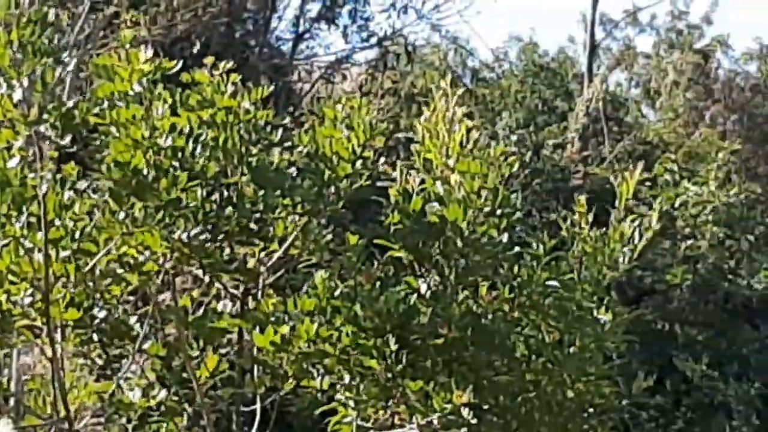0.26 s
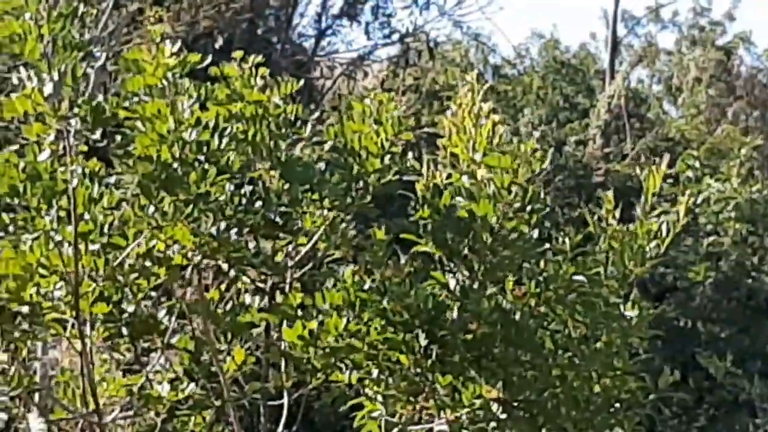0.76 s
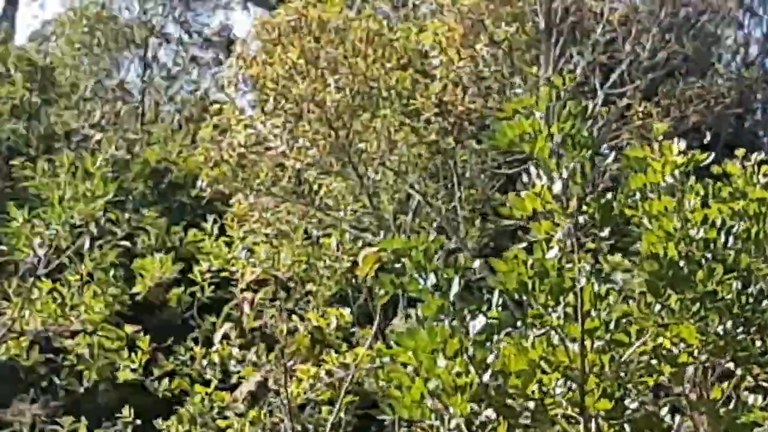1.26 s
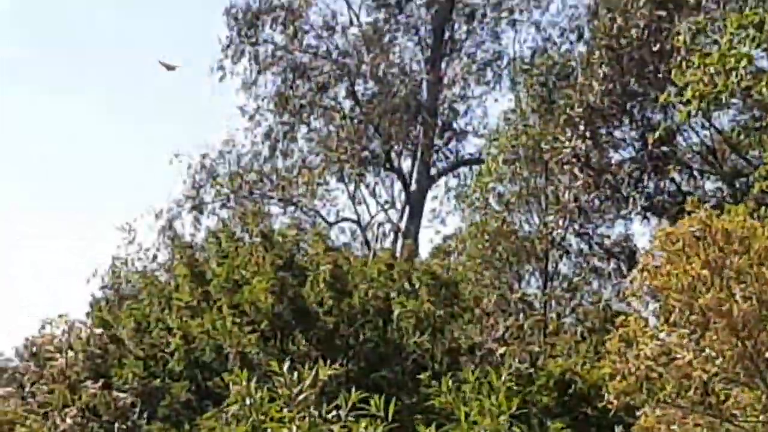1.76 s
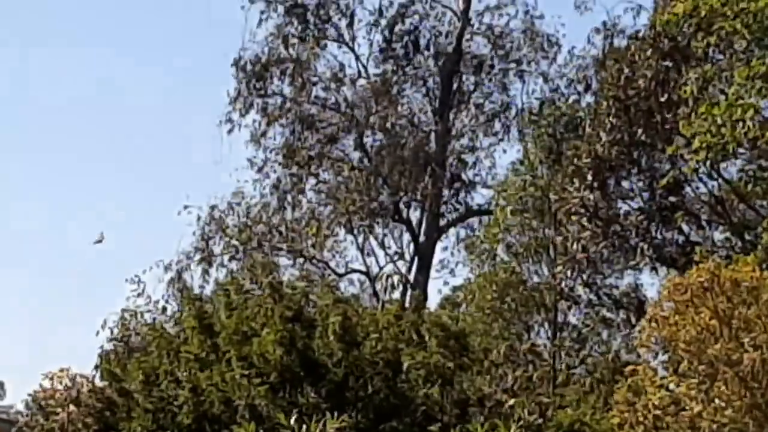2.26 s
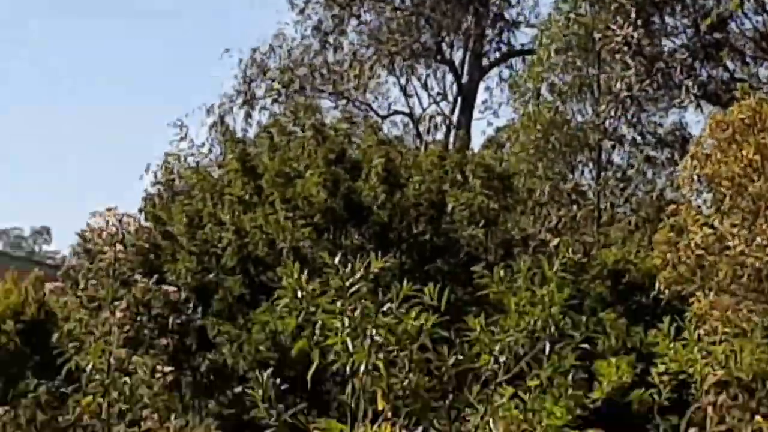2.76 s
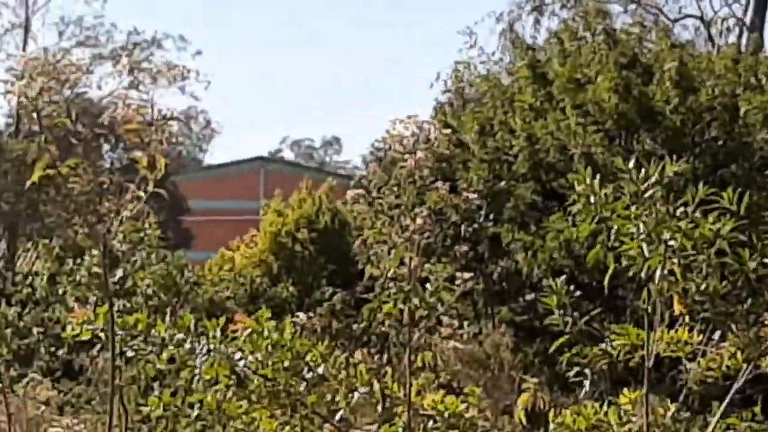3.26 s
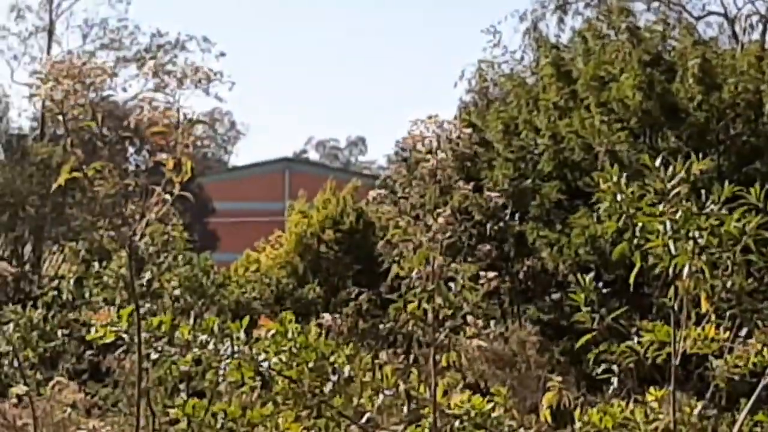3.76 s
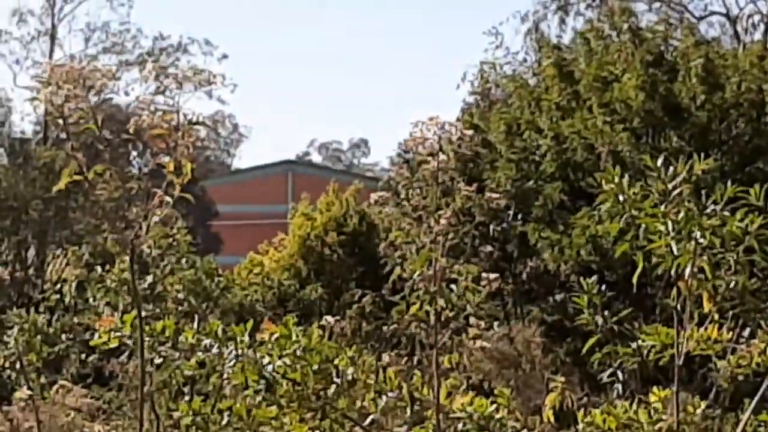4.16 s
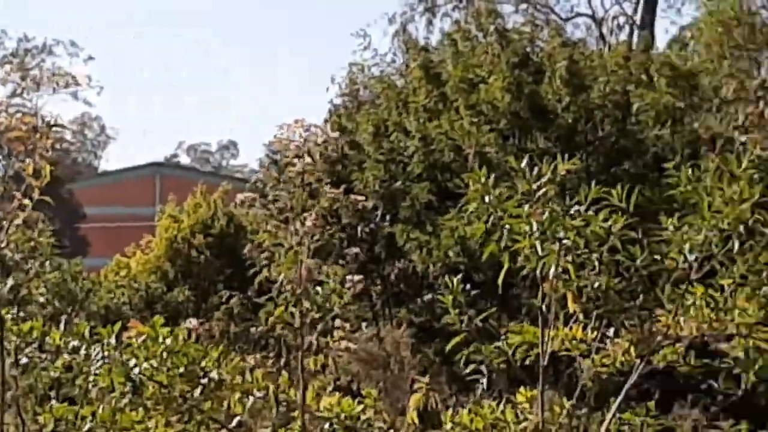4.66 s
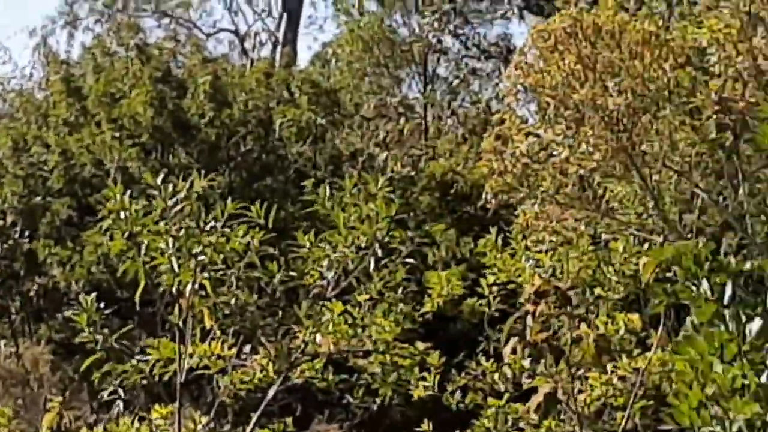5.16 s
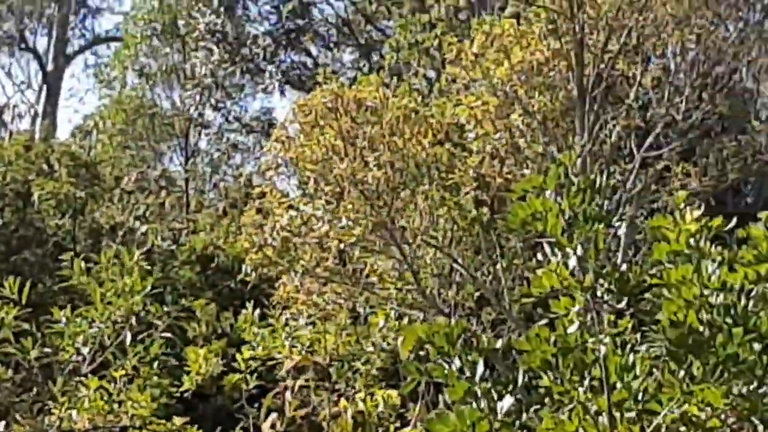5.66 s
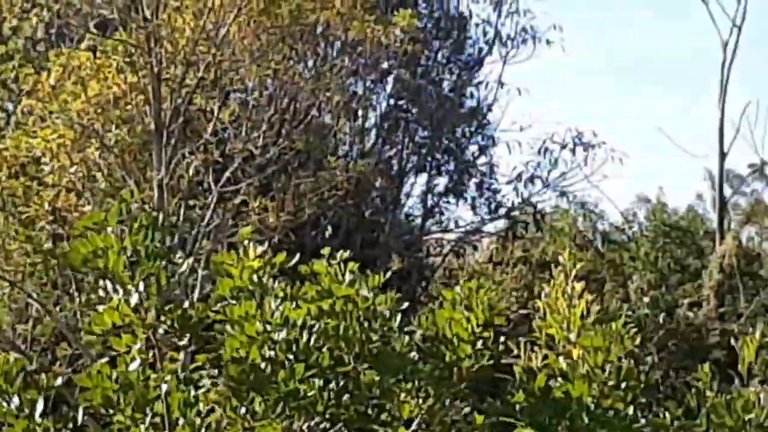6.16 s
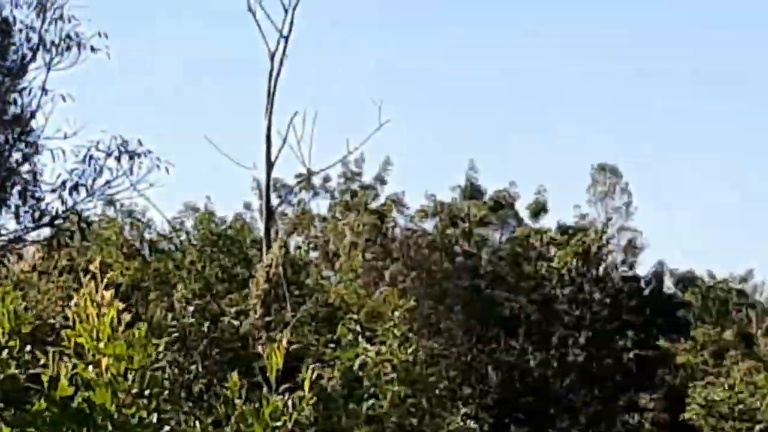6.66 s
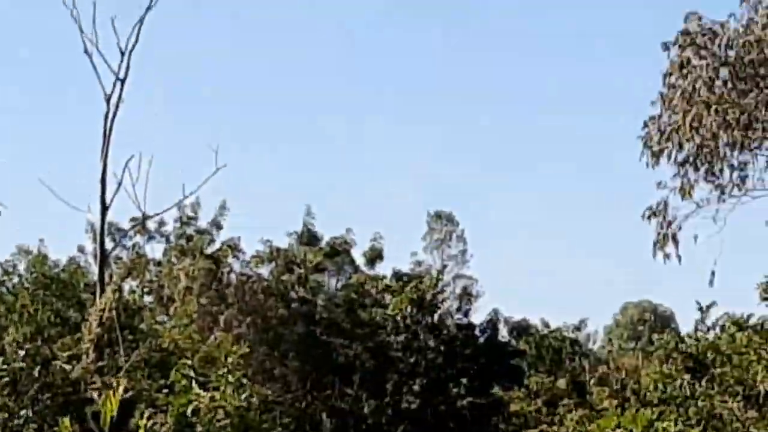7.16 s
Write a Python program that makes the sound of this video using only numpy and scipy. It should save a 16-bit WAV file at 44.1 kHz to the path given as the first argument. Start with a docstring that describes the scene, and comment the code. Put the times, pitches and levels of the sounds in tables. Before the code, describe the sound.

A near bird repeats a sharp two-note chip over chirping crickets and far birdsong while growing gusts of wind buffet and rumble on the microphone.

```python
"""Cricket chirps and a mellow whistle from the far trees come first, then a near bird's two-note chip.
The place is an open field ringed by trees, where more birds whistle, twitter and trill further off.
Gusts buffet the two microphone ports: noise follows the wind strength, and single eddies slap as pulses.
Birds are gliding tones, crickets bursts of tone; random echoes stand for the scatter of the foliage.
A haze of insects, a few dry ticks, a distant wash and a thin hiss lie around them."""
import sys
import numpy as np
from scipy import signal
from scipy.fft import rfft, irfft
from scipy.io import wavfile
from scipy.ndimage import uniform_filter1d

SR = 44100
rng = np.random.default_rng(int(sys.argv[2]) if len(sys.argv) > 2 else 0)


def to_wav(sig):
    """Store sig (one row per channel, or 1-D mono) as 16-bit WAV at the path in sys.argv[1].

    Samples outside -1..1 are clipped; the rate is SR.
    """
    pcm = np.clip(np.atleast_2d(sig), -1, 1) * 32767
    pcm = np.round(pcm).astype(np.int16)
    wavfile.write(sys.argv[1], SR, pcm.T)  # frames by channels


N = 326340
T = np.arange(N) / SR  # time [s]


def undb(db):
    """Decibels to gain."""
    return 10 ** (np.asarray(db) / 20)


def unit(x):
    """Scale to rms 1."""
    return x / np.sqrt(np.mean(x ** 2))


def curve(points, s=T):
    """Straight lines through (time, value) points, read at the times s."""
    return np.interp(s, *np.transpose(points))


def sides(pan_db):
    """Left and right gains of constant mean power; pan_db is left minus right."""
    g = undb(np.array([[.5], [-.5]]) * pan_db)
    return g / np.sqrt(np.mean(g ** 2, axis=0))


def walk(rate, size=N):
    """Smooth chance with spread 1 that changes about rate times a second."""
    f = np.arange(size // 2 + 1) * SR / size
    smooth = rfft(rng.standard_normal(size)) / (1 + (2 * f / rate) ** 4)
    return unit(irfft(smooth, size))


def noise(points):
    """Unrelated left and right noise with the given spectrum, falling away beyond its ends."""
    hz, db = np.transpose(points)
    f = np.arange(N // 2 + 1) * SR / N + 1  # the 1 keeps the logarithm finite
    skirts = np.minimum(f / hz[0], 1) ** 2 * np.minimum(hz[-1] / f, 1) ** 2
    colour = undb(np.interp(np.log(f), np.log(hz), db))
    return unit(irfft(rfft(rng.standard_normal((2, N))) * skirts * colour, N))


def add(out, s, sound):
    """Mix a stereo sound in at time s."""
    i = int(np.clip(s * SR, 0, N - 1))
    out[:, i:i + sound.shape[1]] += sound[:, :N - i]


def glide(length, start_hz, middle_hz, end_hz):
    """Progress 0-1 through a note, and its pitch arching through three points."""
    u = np.linspace(0, 1, int(length * SR))
    arch = np.polyfit([0, .5, 1], [start_hz, middle_hz, end_hz], 2)
    return u, np.polyval(arch, u)


def turn(hz):
    """Phase of an oscillator that follows a pitch."""
    return 2 * np.pi * np.cumsum(hz) / SR


def scatter(t60):
    """One second of random stereo echoes that die by 60 dB in t60 seconds."""
    level = np.sqrt(2 * np.log(1000) / SR / t60)  # offsets the greater energy of a longer tail
    return rng.standard_normal((2, SR)) * undb(-60 * T[:SR] / t60) * level


def foliage(x, near_db, near_t60, far_db, far_t60, spill=0.17):
    """Direct sound, scatter from near leaves and a duller tree-line tail; echoes spill to the other port."""
    near, far = scatter(near_t60), scatter(far_t60)
    far = signal.sosfilt(signal.butter(2, 6000, fs=SR, output="sos"), far)
    onset = np.minimum(T[:SR] / .008, 1)
    echoes = (undb(near_db) * near + undb(far_db) * far) * onset
    spread = (x + spill * x[::-1]) / (1 + spill)
    return x + signal.fftconvolve(spread, echoes, axes=1)[:, :N]


CHIP_LENGTH_S, CHIP_ATTACK_S, CHIP_RELEASE_S = 0.02206, 0.0059, 0.0086


def chip(hz, over_db, under_db):
    """A chip falls steeply, then levels off; partials flicker, each on its own, round a tone at hz."""
    fall = np.clip(.14 + (hz - 3300) / 3000, .07, .16)  # higher chips fall further
    u, pitch = glide(CHIP_LENGTH_S, hz * (1 + fall), hz, hz * 0.92)
    phase = turn(pitch / 2 * (1 + .008 * walk(800, size=len(u))))  # an octave below hz
    flicker = [undb(3.5 * walk(350, size=len(u))) for _ in range(4)]
    third = flicker[0] * np.sin(3 * phase) * u ** .5
    fourth = undb(-13) * flicker[1] * np.sin(4 * phase) * u
    undertone = undb(under_db) * flicker[2] * np.sin(phase)
    main_tone = flicker[3] ** .5 * np.sin(2 * phase)
    voice = main_tone + undertone + undb(over_db + 2) * (third + fourth)
    attack = np.minimum(u * CHIP_LENGTH_S / CHIP_ATTACK_S, 1)
    release = np.minimum((1 - u) * CHIP_LENGTH_S / CHIP_RELEASE_S, 1)
    return voice * attack * release * undb(0.5)


# The near bird's calls: (time of the loud chip [s], level [dB], pitch [Hz], overtones before chip()'s
# gain [dB], lead of the soft chip [s], its level relative to the loud one [dB], left minus right [dB])
CHIP_CALLS = [(0.2422, -39.5, 3400, -18, 0.053, -9, -6), (1.149, -38, 3383, -19, 0.051, -12, -7),
              (2.0965, -38.5, 3372, -13, 0.06, -8.5, -8), (2.9804, -38.5, 3348, -7, .057, -8, -11),
              (4.9786, -41, 3314, -13.5, 0.052, -18, -15), (5.6679, -36.5, 3486, -10.5, .058, -12, -23.5),
              (6.5514, -39.5, 3450, -6, 0.053, -10, -7), (7.358, -43, 3220, -12, 0.044, -23, -8)]
# the soft chip: pitch over the loud chip's, and its partials; then the loud chip's octave below
LEAD_RATIO, LEAD_OVERTONES_DB, LEAD_UNDERTONE_DB = 0.93, -4.5, -18.5
UNDERTONE_DB = -28.5
PORT_LAG = 3  # samples by which the right port hears the bird later


def chipping_bird():
    """A soft chip, then a loud one; the ground bounce beats against each glide and leaves scatter both."""
    out = np.zeros((2, N))
    for s, db, hz, over_db, lead_s, lead_db, pan in CHIP_CALLS:
        soft = undb(lead_db) * chip(hz * LEAD_RATIO, LEAD_OVERTONES_DB, LEAD_UNDERTONE_DB)
        loud = chip(hz, over_db, UNDERTONE_DB)
        for start, note in ((s - lead_s, soft), (s, loud)):
            heard = note * undb(db) * sides(pan)
            add(out, start - .004, heard)
            add(out, start + rng.uniform(.002, .006), heard * undb(-11))  # ground bounce
    left, right = foliage(out, near_db=-6, near_t60=.15, far_db=-9, far_t60=.9, spill=.4)
    return np.array([left, np.roll(right, PORT_LAG)])


# Single eddies that slap the windward (left) port: (time [s], level before gain [dB], swing rate [Hz])
EDDY_SLAPS = [(0.781, -44.5, 102), (1.159, -38, 79), (1.454, -39, 98), (1.579, -38, 97), (1.749, -38, 77.5),
              (2.016, -35.5, 81), (2.166, -34, 109), (2.242, -29, 109), (2.32, -43, 137), (2.626, -34, 128),
              (2.725, -34, 88), (2.921, -39.5, 94.5), (3.133, -39.5, 84.4), (3.311, -39.5, 129),
              (3.465, -34.5, 103), (3.665, -32, 88), (3.715, -33.5, 147), (4.048, -36.5, 107),
              (4.186, -32.5, 108), (4.468, -31.5, 151), (4.545, -33, 92), (4.799, -34, 132),
              (4.847, -30, 153), (4.888, -21, 133), (5.04, -26, 139), (5.124, -27, 155), (5.194, -20, 180),
              (5.238, -24, 212), (5.28, -24.5, 147), (5.36, -22, 220), (5.549, -24, 137), (5.591, -30, 160),
              (5.755, -25, 107), (5.822, -28, 97), (5.983, -32.5, 91), (6.078, -36.5, 117),
              (6.142, -34.5, 111), (6.226, -27, 86), (6.615, -26.5, 114), (6.862, -29, 91),
              (7.204, -28.5, 143), (7.257, -20.5, 126), (7.305, -35, 170), (7.366, -27.5, 233)]
EDDY_GAIN_DB, EDDY_PAN_DB = 6.5, 36.5  # pan: left minus right


def buffets():
    """An eddy is one pressure swing; the microphone's bass roll-off rings after it."""
    out, t = np.zeros((2, N)), T[:SR // 16]
    roll_off = signal.butter(3, 66, "high", fs=SR, output="sos")
    for s, db, hz in EDDY_SLAPS:
        u = (t - .0105) * 2 * np.pi * hz
        slap = signal.sosfilt(roll_off, u * np.exp(-u ** 2 / 2))
        push_or_pull = rng.choice([-1, 1])
        add(out, s - .005, slap * push_or_pull * undb(db + EDDY_GAIN_DB) * sides(EDDY_PAN_DB))
    return out


# Wind strength at the ports: (time [s], left level [dB], right level [dB])
GUST_STRENGTH = [(0, -59.5, -53.5), (.3, -56.5, -56), (0.952, -61, -50), (1.45, -45, -54),
                 (1.68, -54.5, -55.5), (2.22, -43.5, -54), (2.48, -60.5, -59.5), (2.66, -47.5, -58),
                 (2.95, -41.5, -55), (3.08, -55, -63), (3.16, -43, -61), (3.68, -43.5, -47),
                 (3.9, -59.5, -60.5), (4.12, -44, -54), (4.27, -56, -60), (4.5, -34.5, -45),
                 (4.67, -51.5, -60), (4.861, -34, -54), (5.28, -31, -44.5), (5.699, -37, -56),
                 (5.89, -42.5, -47), (5.99, -41.5, -57), (6.42, -46, -51), (6.62, -38.5, -48),
                 (7.001, -47.5, -54), (7.33, -28.5, -24)]
# Spectrum of the deep rumble: (frequency [Hz], relative level [dB])
RUMBLE_SPECTRUM = [(20, -50), (35, -35.5), (55, -9.5), (78, -6), (100, -10), (150, -20.5), (250, -45),
                   (500, -68), (1000, -69.5), (1400, -68.5)]
# Spectrum of the brighter flutter: (frequency [Hz], relative level [dB])
FLUTTER_SPECTRUM = [(40, -32), (90, -5.5), (160, 3), (260, -7.5), (400, -20.5), (650, -34.5), (1000, -57.5),
                    (2000, -75)]
SWIRL_DB, SWIRL_PER_S = 4.5, 22  # the wind is never even
WAKE_DB, WAKE_RISE_S = -6.5, 0.012  # the rumble that trails each eddy, relative to its table level
LULL_EDGE_HZ, LULL_DB = 42, -35.5  # wind weaker than this keeps mostly its deepest rumble


def wind():
    """Turbulence at each port: a deep rumble, and a flutter in bursts that grows faster than the gust."""
    s, left_db, right_db = np.transpose(GUST_STRENGTH)
    swirl = SWIRL_DB * np.tanh([walk(SWIRL_PER_S), walk(SWIRL_PER_S)])
    gust_db = np.array([np.interp(T, s, left_db), np.interp(T, s, right_db)])
    u = T[:SR // 4] / WAKE_RISE_S
    wake = (u * np.exp(1 - u)) ** 2
    wakes = np.zeros((2, N))
    for start, db, _ in EDDY_SLAPS:
        add(wakes, start - .005, wake * undb(db + WAKE_DB) * sides(EDDY_PAN_DB))
    strength = np.hypot(undb(gust_db + swirl), wakes)
    rumble = noise(RUMBLE_SPECTRUM)
    deep = signal.sosfiltfilt(signal.butter(2, LULL_EDGE_HZ, fs=SR, output="sos"), rumble)
    rumble = deep + (rumble - deep) * strength / (strength + undb(LULL_DB))
    rumble /= uniform_filter1d(rumble ** 2, SR // 16) ** .5  # level it, so that it keeps the gust's strength
    bursts = undb(7 * np.tanh([walk(50), walk(61)]))
    flutter = unit(noise(FLUTTER_SPECTRUM) * bursts)
    flutter = flutter * undb(-5.5) * (strength / undb(-31.5)) ** 0.55
    return (undb(4.0) * rumble + flutter) * strength


# A thin climbing trill: (time [s], pitch mark [Hz], level before gain [dB]); notes start at 0.87 of the mark
CLIMBING_TRILL = [(5.145, 6130, -56), (5.419, 6870, -53), (5.6, 7510, -50), (5.891, 7980, -57),
                  (5.939, 9900, -54.5), (6.06, 9100, -82)]
TRILL_PERIOD_S = 0.05


def trilling_bird():
    """A nearly even run of buzzy falling notes, blurred by the trees in between."""
    out = np.zeros((2, N))
    times, marks_hz, levels_db = np.transpose(CLIMBING_TRILL)
    for s in np.arange(times[0], times[-1], TRILL_PERIOD_S):
        mark_hz, db = np.interp(s, times, marks_hz), np.interp(s, times, levels_db)
        u, pitch = glide(0.036, mark_hz * 0.87, mark_hz * 0.87, mark_hz * 0.61)
        note = np.sin(turn(pitch * (1 + 0.044 * walk(1300, size=len(u))))) * np.sin(np.pi * u)
        add(out, s + .006 * rng.standard_normal(), note * undb(db - 8.5) * sides(0.9))
    return foliage(out, near_db=7, near_t60=.65, far_db=-3, far_t60=.7)


def whistle(length, start_hz, middle_hz, end_hz, rasp):
    """A nearly pure note that wavers in the moving air, made raspy by a quick tremor of pitch."""
    u, pitch = glide(length, start_hz, middle_hz, end_hz)
    tremor, waver, drift = (walk(rate, size=SR // 2)[:len(u)] for rate in (700, 90, 60))
    tone = np.sin(turn(pitch * (1 + .05 * rasp ** 2 * tremor + .008 * drift)))
    return tone * undb(3 * waver) * np.sin(np.pi * u).clip(0)


def calls(rows, start_ratio, end_ratio, rasp, pan_db):
    """Calls of one kind share a contour around their middle pitch, a rasp and a direction."""
    out = np.zeros((2, N))
    for s, length, hz, db in rows:
        note = whistle(length, hz * start_ratio, hz, hz * end_ratio, rasp)
        add(out, s, note * undb(db) * sides(pan_db))
    return out


ARCH_S, ARCH_LENGTH_S, ARCH_LOW_HZ, ARCH_HIGH_HZ = 4.854, 0.086, 5160, 8330  # pitches at the top


def arching_call():
    """Both sides of the syrinx arch together and mix in the throat, which adds a tone at their sum."""
    out = np.zeros((2, N))
    u, arch = glide(ARCH_LENGTH_S, .93, 1, .925)
    arch = arch * (1 + .005 * walk(500, size=len(u)))
    low, high = turn(arch * ARCH_LOW_HZ), turn(arch * ARCH_HIGH_HZ)
    voice = undb(-56.0) * np.sin(low) * sides(-2)
    voice = voice + undb(-64.5) * np.sin(high) * sides(16)
    voice = voice + undb(-59.0) * np.sin(low + high) * sides(-21)
    add(out, ARCH_S, voice * undb(4.0 * walk(150, size=len(u))) * np.sin(np.pi * u).clip(0))
    return out


# Short raspy falling calls: (time [s], length [s], middle pitch [Hz], level [dB])
RASPY_CALLS = [(1.518, 0.083, 4360, -64), (1.75, 0.043, 4820, -55.5), (1.78, 0.051, 4430, -55),
               (1.81, 0.017, 4350, -49), (1.83, 0.049, 4100, -67), (2.522, 0.026, 5600, -68),
               (2.55, 0.057, 4150, -64.5), (3.702, 0.068, 3560, -63), (3.708, 0.056, 1750, -68),
               (3.794, 0.042, 4520, -69), (3.9, 0.069, 3530, -65), (4.462, 0.02, 5890, -56.5),
               (4.462, 0.032, 4120, -56.5), (4.47, 0.051, 2696, -68), (4.55, 0.037, 2770, -70.5),
               (4.92, 0.02, 4510, -46), (4.93, 0.044, 2865, -61), (5.133, 0.086, 4310, -62)]
# Very high lisping notes: (time [s], length [s], middle pitch [Hz], level [dB])
LISPING_NOTES = [(.41, 0.039, 9700, -66), (.51, 0.068, 10300, -67), (.57, 0.067, 10050, -65),
                 (1.968, 0.23, 10100, -69.5), (2.368, 0.13, 7030, -72), (3.25, 0.22, 7540, -75.5),
                 (4.245, 0.28, 9700, -77), (5.95, 0.43, 9300, -80), (6.03, 0.46, 7800, -72),
                 (6.36, 0.1, 9550, -75), (7.19, 0.065, 7300, -61.5)]
# Rising pips and squeaks: (time [s], length [s], middle pitch [Hz], level [dB])
RISING_PIPS = [(.33, 0.1, 7770, -67), (.44, 0.12, 9530, -67.5), (1.022, 0.023, 7450, -68),
               (3.048, 0.018, 6930, -59), (3.82, 0.038, 3300, -66), (3.825, .035, 5400, -67),
               (4.678, 0.011, 7100, -59), (6.426, 0.078, 4480, -61.5), (6.707, 0.0082, 7200, -53)]
# Thin downward slurs: (time [s], length [s], start [Hz], middle [Hz], end [Hz], level before swell [dB])
FALLING_SLURS = [(2.471, 0.15, 8260, 6490, 5480, -49.5), (3.326, 0.13, 7200, 6010, 5350, -50),
                 (6.22, 0.14, 9040, 6960, 6530, -57), (7.214, 0.18, 7650, 6450, 5370, -56.5)]


def surrounding_birds():
    """Slurs, rasps, lisps and pips from the trees and one arching call from a nearer bird, as gliding tones."""
    out = calls(RASPY_CALLS, start_ratio=1.12, end_ratio=.9, rasp=.85, pan_db=-9)
    out += calls(LISPING_NOTES, start_ratio=1.01, end_ratio=0.95, rasp=0.71, pan_db=11.5)
    out += calls(RISING_PIPS, start_ratio=0.93, end_ratio=1.06, rasp=.45, pan_db=-6)
    for s, length, start_hz, middle_hz, end_hz, db in FALLING_SLURS:
        note = whistle(length, start_hz, middle_hz, end_hz, rasp=.52)
        swell = np.linspace(.35, 1.4, len(note))  # gain rises as the pitch falls
        add(out, s, note * swell * undb(db) * sides(-11.0))
    return foliage(out + arching_call(), near_db=-5, near_t60=.15, far_db=-6, far_t60=.7, spill=.35)


# Mellow far whistles, and short low and high tones with the near bird's chip call at 4.9 s: (time [s],
# length [s], start [Hz], middle [Hz], end [Hz], level before a 0.5 dB cut [dB], left minus right [dB])
WHISTLED_NOTES = [(0.026, 0.22, 2210, 2397, 2255, -63, 11), (0.263, 0.085, 3500, 2793, 2430, -58, 2),
                  (0.406, 0.097, 2470, 2490, 2700, -65.5, 0), (0.487, 0.16, 2675, 2748, 2735, -59.5, 20),
                  (0.614, 0.22, 2740, 2750, 2755, -77, -3), (1.015, 0.19, 3060, 2850, 2620, -68.5, -14),
                  (1.78, 0.16, 2110, 1954, 1810, -69.5, 3), (2.09, 0.33, 1120, 1165, 1194, -77.5, -15),
                  (2.109, 0.29, 2570, 2230, 2054, -73, -1), (3.123, 0.18, 2014, 2280, 2540, -73, 3),
                  (3.192, .45, 1460, 1760, 1447, -78.5, -2), (3.274, 0.37, 2490, 2705, 2310, -70.5, -12),
                  (3.877, 0.28, 2916, 2804, 2660, -67, -6), (3.913, 0.18, 1464, 1440, 1400, -72.5, 5),
                  (4.137, 0.18, 2210, 2390, 2400, -73, 7), (4.906, 0.044, 1520, 1457, 1360, -57.5, -6),
                  (4.985, 0.037, 1625, 1544, 1470, -59.5, -8), (4.908, 0.027, 8300, 8060, 7640, -58.5, 10),
                  (5.418, 0.047, 3270, 3140, 3080, -78, -2), (6.37, 0.066, 2300, 2150, 2130, -77, 3),
                  (7.058, .14, 5220, 4750, 4380, -68, -14), (7.101, 0.082, 2950, 2724, 2480, -59.5, -20),
                  (7.2, 0.24, 2460, 2305, 1990, -75, -5)]


def whistled_notes():
    """Far whistles and the short tones at 4.9 s: gliding tones broken up by as much echo as direct sound."""
    out = np.zeros((2, N))
    for s, length, start_hz, middle_hz, end_hz, db, pan in WHISTLED_NOTES:
        note = whistle(length, start_hz, middle_hz, end_hz, rasp=.58)
        add(out, s, note * undb(db - 0.5) * sides(pan))
    return foliage(out, near_db=0, near_t60=.16, far_db=-3, far_t60=.7, spill=.4)


CHATTER_PER_S, CHATTER_DB, CHATTER_LOW_HZ, CHATTER_HIGH_HZ = 7.6, -79.5, 2560, 4690  # middle pitches


def distant_chatter():
    """Birds too far off to tell apart: faint short notes at random, more echo than direct sound."""
    out = np.zeros((2, N))
    for when, high, long, bend, side in rng.random((int(CHATTER_PER_S * T[-1]), 5)):
        hz = CHATTER_LOW_HZ * (CHATTER_HIGH_HZ / CHATTER_LOW_HZ) ** high
        note = whistle(.03 + .07 * long, hz * (.92 + .24 * bend), hz, hz * .95, rasp=.7)
        add(out, when * T[-1], note * undb(CHATTER_DB) * sides(12 * side - 8))
    return foliage(out, near_db=0, near_t60=.2, far_db=0, far_t60=.7)


# The nearest cricket's runs of evenly spaced chirps: (time [s], chirps [count], level before gain [dB])
CRICKET_RUNS = [(.034, 3, -65), (.495, 4, -70), (1.1, 2, -63.5), (1.435, 2, -63), (1.763, 5, -62),
                (2.546, 9, -58), (3.947, 3, -59.5), (4.431, 2, -57.5), (4.731, 6, -64), (5.974, 2, -61),
                (6.433, 3, -58.5), (6.887, 1, -57.5), (7.066, 3, -56.5)]
CHIRP_PERIOD_S, STROKE_PERIOD_S = .1524, .0255
FOURTH_STROKE_SHARE = 0.22  # most chirps have three wing strokes


def cricket():
    """Chirps of three or four wing strokes; each rings the wing, and its pitch sags as it slows."""
    out = np.zeros((2, N))
    u, pitch = glide(.016, 6400, 6440, 6270)
    for start, chirps, db in CRICKET_RUNS:
        for s in start + CHIRP_PERIOD_S * np.arange(round(chirps)):
            strokes = 3 + int(rng.random() < FOURTH_STROKE_SHARE)
            for k in range(strokes):
                size, detune_hz = undb(0.73 * rng.standard_normal()), 20 * rng.standard_normal()
                stroke = size * np.sin(turn(pitch + detune_hz)) * np.sin(np.pi * u)
                add(out, s + k * STROKE_PERIOD_S, stroke * undb(db + 3.5) * sides(-16.5))
    return foliage(out, near_db=-9, near_t60=.1, far_db=-12, far_t60=.4, spill=.2)


# Loudness of the fainter cricket: (time [s], level before gain and scatter [dB])
SECOND_CRICKET_LEVEL = [(0, -78), (1, -66), (2.2, -60), (3.6, -57.5), (4, -54), (5.1, -52), (6, -54.5),
                        (7.4, -66)]


def second_cricket():
    """Another cricket repeats a brisk pair of falling strokes about twelve times a second."""
    out = np.zeros((2, N))
    u, pitch = glide(.009, 6150, 5600, 5150)
    gaps_s = .081 + .007 * rng.standard_normal(int(T[-1] / .084))
    for s in np.cumsum(gaps_s):
        db = curve(SECOND_CRICKET_LEVEL, s)
        for lag in (0, .0125):
            stroke = np.sin(turn(pitch + 60 * rng.standard_normal())) * np.sin(np.pi * u)
            add(out, s + lag, stroke * undb(db - 5.0 + 2 * rng.standard_normal()) * sides(-21))
    return foliage(out, near_db=0, near_t60=.12, far_db=-5, far_t60=.4, spill=.1)


def trilling_insect(hz, stroke_hz, width):
    """Endless wing strokes on a ringing wing; pace and pitch drift, and the sound fades in and out."""
    strokes = .7 + .35 * np.sin(turn(stroke_hz * (1 + 0.1 * walk(12))))
    ring = np.sin(turn(hz + width * (walk(200) + .6 * walk(5))))
    fading = undb(1.5 * np.tanh(walk(3)) + 2 * walk(30))
    return unit(strokes * ring * fading)


# The slow swell of the insect chorus: (time [s], level before each part's gain [dB])
CHORUS_SWELL = [(0, -63), (.9, -65.5), (2.25, -61), (2.65, -63.5), (4.1, -64), (5.1, -61.5), (6.2, -63.5),
                (7.4, -59.5)]
# Loudness of the nearest trilling insect: (time [s], level before a 2.5 dB cut [dB])
NEAREST_TRILL_LEVEL = [(0, -84), (.4, -72.5), (1.6, -73), (3, -71), (4.7, -72.5), (5.5, -72), (7.4, -77)]
# Spectrum of the still more distant insects: (frequency [Hz], relative level [dB])
HAZE_SPECTRUM = [(3600, -19), (4250, 6), (4700, 0.5), (5100, 2.5), (5500, 3), (5950, -1), (6300, 11),
                 (6650, -3.5), (6950, 1), (7300, -12), (8500, -33)]


def insects():
    """Insects trill on their own pitches in a noise haze of still more distant ones."""
    chorus = undb(-14.5) * trilling_insect(hz=4350, stroke_hz=41.8, width=56) * sides(-7.0)
    chorus += undb(-11.5) * trilling_insect(hz=6390, stroke_hz=33.9, width=88) * sides(-21.0)
    swell = undb(curve(CHORUS_SWELL))
    nearest = trilling_insect(hz=4680, stroke_hz=33, width=50)
    nearest = nearest * undb(curve(NEAREST_TRILL_LEVEL) - 2.5) * sides(0)
    haze = noise(HAZE_SPECTRUM) * undb(1.2 * walk(12))
    trills = foliage(chorus * swell + nearest, near_db=-2, near_t60=.039, far_db=-10, far_t60=.5, spill=.2)
    return trills + undb(-4.0) * haze * swell * sides(-5.0)


# Faint dry ticks close by: (time [s], level before a 5 dB boost [dB])
DRY_TICKS = [(1.131, -49), (3.205, -58), (3.765, -59), (6.83, -54)]
# Spectrum of the ticks: (frequency [Hz], relative level [dB])
TICK_SPECTRUM = [(1500, 1), (5000, 11), (9000, -16), (13000, 2.5), (16000, 9.5)]


def ticks():
    """Tiny snaps: noise that decays exponentially within a few milliseconds."""
    envelope, t = np.zeros((2, N)), T[:SR // 50]
    for s, db in DRY_TICKS:
        add(envelope, s, np.exp(-t / .0028) * undb(db + 5) * sides(-3))
    return envelope * noise(TICK_SPECTRUM)


# Loudness of the distant wash: (time [s], level before a 2 dB cut [dB])
WASH_LEVEL = [(0, -65.5), (.95, -69.5), (1.4, -67.5), (1.65, -70), (2.2, -62.5), (2.5, -70), (2.85, -67.5),
              (3.08, -67), (3.4, -66.5), (4.3, -68), (4.73, -69), (5.05, -65.5), (5.7, -68), (6.2, -68.5),
              (7.0, -67.5), (7.4, -66)]
# Spectrum of the wash: (frequency [Hz], relative level [dB])
WASH_SPECTRUM = [(60, 3.5), (250, 7.5), (500, 2), (750, 1.5), (1000, -2.5), (1350, -0.5), (1540, 4.5),
                 (1800, -4.5), (2050, 2), (2400, -6.5), (2900, -6), (3500, 1.5), (4000, -1), (6000, -44),
                 (8000, -34)]
# Loudness of the hiss: (time [s], level [dB])
THIN_HISS_LEVEL = [(0, -74.5), (.75, -72), (1.1, -70.5), (2.5, -70.5), (7.4, -69.5)]
# Spectrum of the hiss: (frequency [Hz], relative level [dB])
HISS_SPECTRUM = [(7500, -50.5), (9500, -15), (11000, -6.5), (12000, -0.5), (13200, 4), (16000, 2.5)]


def open_air():
    """The faint wash of distant land, swelling and sinking, and a thin hiss, both shaped noise."""
    wash = undb(curve(WASH_LEVEL) - 2) * noise(WASH_SPECTRUM) * sides(-3.5)
    hiss = undb(curve(THIN_HISS_LEVEL)) * noise(HISS_SPECTRUM) * sides(-6.0)
    return wash + hiss


def scene():
    """All that reaches the two ports."""
    birds = chipping_bird() + trilling_bird() + surrounding_birds() + whistled_notes() + distant_chatter()
    grass = cricket() + second_cricket() + insects()
    return birds + buffets() + wind() + grass + ticks() + open_air()


def record(dry):
    """The recorder cuts the top above 15750 Hz; the sound fades over its last few milliseconds."""
    fade = np.clip((T[-1] - T) / .004, 0, 1)
    top_cut = signal.ellip(10, .2, 80, 15750, fs=SR, output="sos")
    return signal.sosfilt(top_cut, dry) * fade


dry = scene()
out = record(dry)
to_wav(out)
```